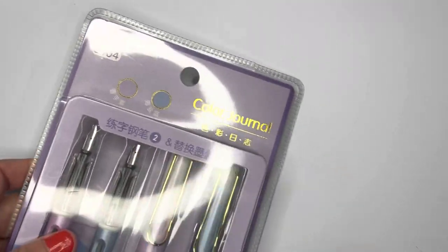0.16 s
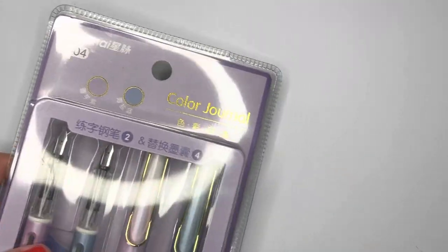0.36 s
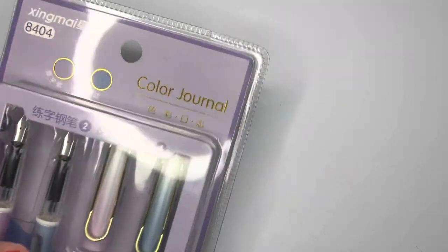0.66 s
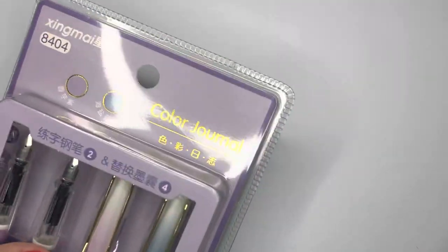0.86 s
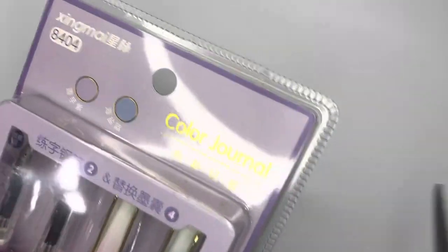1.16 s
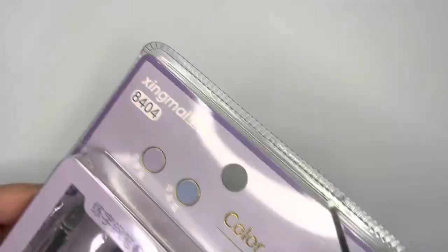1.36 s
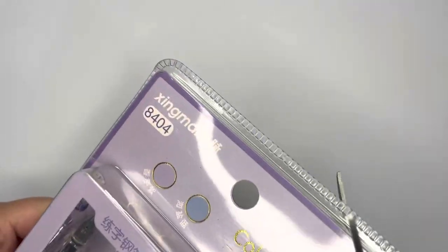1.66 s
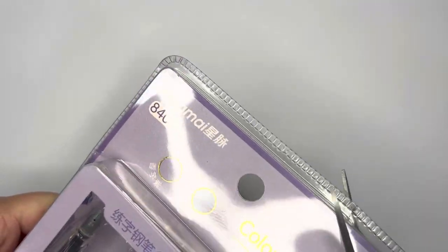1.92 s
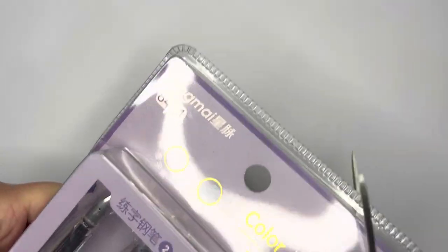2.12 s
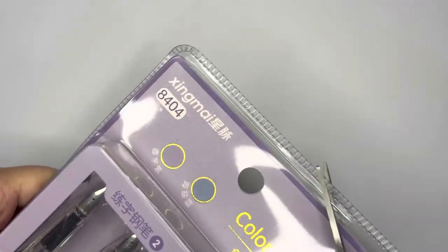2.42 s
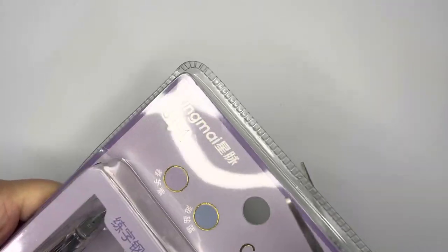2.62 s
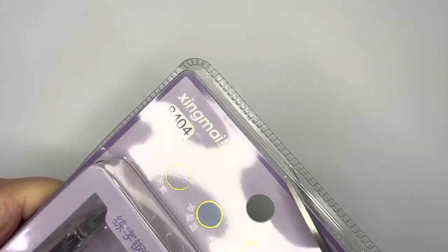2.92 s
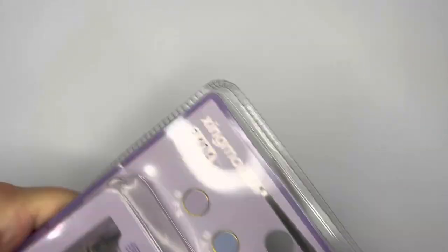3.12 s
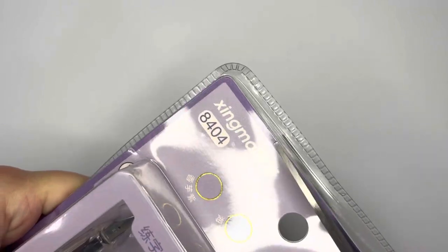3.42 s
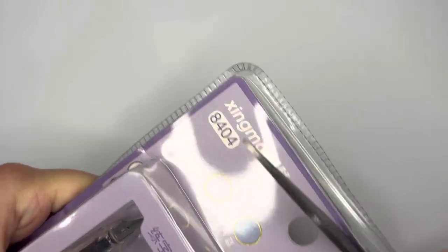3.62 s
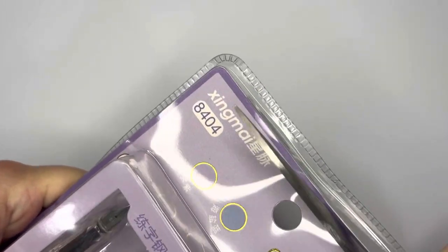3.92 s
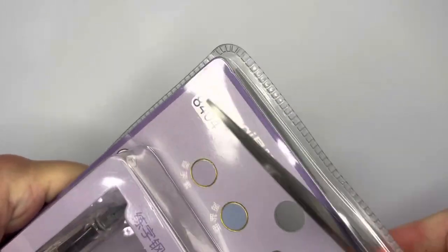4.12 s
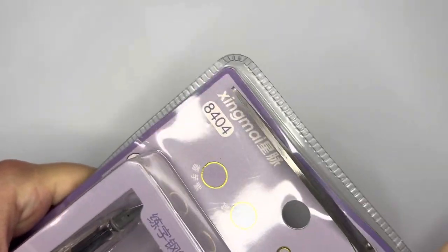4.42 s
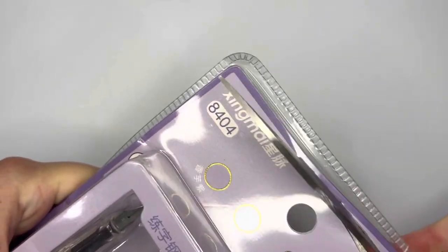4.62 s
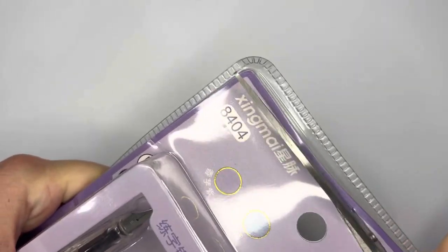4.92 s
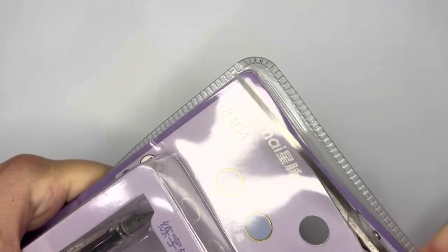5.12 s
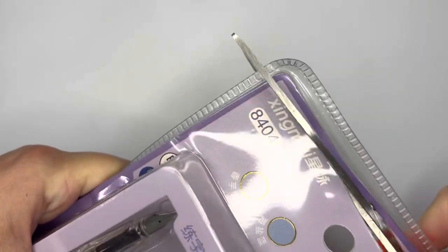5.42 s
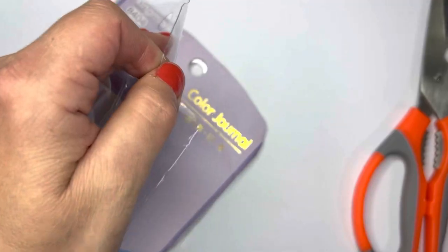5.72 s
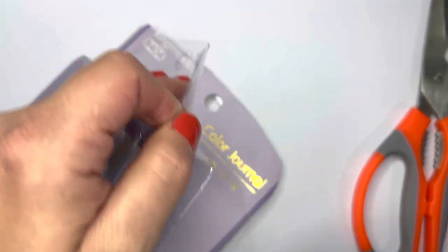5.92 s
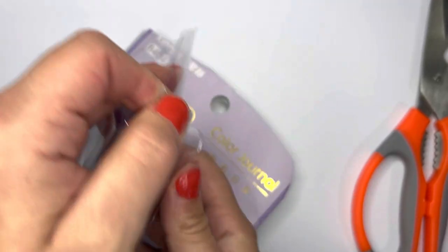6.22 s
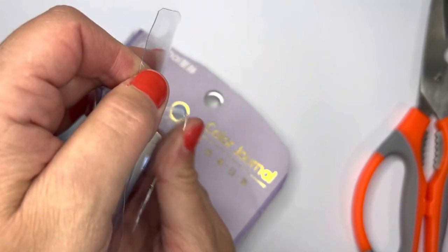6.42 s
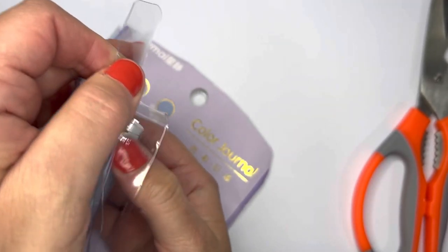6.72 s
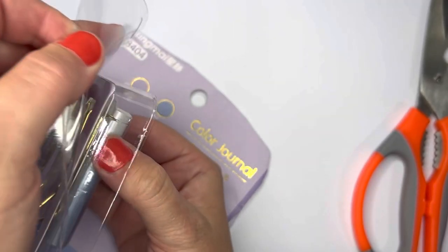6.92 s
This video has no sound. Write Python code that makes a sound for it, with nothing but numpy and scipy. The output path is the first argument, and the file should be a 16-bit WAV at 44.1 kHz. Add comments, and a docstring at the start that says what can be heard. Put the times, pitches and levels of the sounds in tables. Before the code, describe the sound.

A small, quiet indoor space with low rumble and very faint hum, heard close in stereo with little reverberation. From 0 to 0.75 s fingers shift on a stiff plastic pack: soft rubbing, dull thuds and several hollow crackles. It is nearly still until about 1.3 s, when scissors bite with a click and short scrape. Sparse ticks follow, then from 2.0 s cutting grows busy: gritty blade strokes, boxy plastic knocks and sharp snaps, with a strong hollow pop at 2.3 s. Irregular clusters continue through 3 and 4 s, many clicks turning brighter and thinner, until about 5.47 s. The room tail breaks off at 5.5 s. Fingers then slide over the freed flap, with stronger resonant rubs near 5.7 and 6.05 s. At 6.45 s a loud crack bursts out, followed by a brief creak, light rubbing, small ticks and another faint creak at 7 s.

```python
"""Cutting open a blister pack

Fingers shift on a stiff plastic pack, scissors cut its edge, then fingers slide over the flap and prise it up.
Cracks and handling knocks: noise bursts through shell modes, treble first. Bumps: dull thuds and a slow sway.
Scrapes and creaks: stick-slip noise through plastic modes; faint rustling noise patches at random moments.
Small quiet room, low rumble and hum, two close microphone ports; reverberation breaks off at the jump from
cutting to prising."""
import sys
import numpy as np
from scipy import signal
from scipy.fft import rfft, irfft, next_fast_len
from scipy.io import wavfile
from scipy.ndimage import uniform_filter1d

SR = 44100
rng = np.random.default_rng(int(sys.argv[2]) if len(sys.argv) > 2 else 0)


def wav_out(sig):
    """Save sig, one row per channel (or a flat mono array), as 16-bit PCM at SR to the path in sys.argv[1]."""
    wavfile.write(sys.argv[1], SR, np.round(np.clip(np.atleast_2d(sig).T, -1, 1) * 32767).astype(np.int16))


N = 311346
TIME_S = np.arange(N) / SR

# room rumble spectrum: (frequency [Hz], relative density [dB])
AIR_SPECTRUM = [(15, -20.5), (30, -7), (70, 10.5), (110, 0.5), (210, -6), (350, -10.5), (750, -42.5),
                (2500, -68), (5000, -42), (15000, -51)]
# mains and fan hum: (frequency [Hz], rms before waver [dB])
HUM_TONES = [(60, -64), (119.5, -61.5), (198.5, -60)]
# fingers shift their hold, later slide over the freed flap:
# (start [s], length [s], level [dB], hiss re level [dB])
FINGER_STROKES = [(-.02, 0.045, -46, -17.5), (0.046, 0.25, -54.5, -12.5), (0.215, 0.027, -44.5, -14.5),
                  (0.362, 0.068, -47, -18.5), (0.467, 0.16, -55.5, -8.5), (0.625, 0.09, -48.5, -9.5),
                  (0.754, 0.18, -74, 7.5), (0.976, .04, -69.5, 16.5), (1.08, 0.17, -76, 15),
                  (5.5, 0.023, -73, -18), (5.617, 0.037, -51, -11), (5.706, 0.2, -42, -16),
                  (5.97, .1, -57, -5), (6.045, .085, -35, -13.5), (6.181, 0.24, -47.5, -4),
                  (6.344, 0.058, -38, -6.5), (6.45, 0.13, -36.5, -12), (6.597, 0.1, -51.5, -6.5),
                  (6.728, 0.057, -49.5, -5.5), (6.829, 0.063, -51, -5), (6.939, 0.066, -52, -3.5)]
# sliding finger spectrum: (frequency [Hz], relative density [dB])
FINGER_SPECTRUM = [(120, 5.5), (300, -4), (450, 2), (750, 0.5), (1100, -3), (1700, 0.5), (2400, -10),
                   (3200, -5), (4500, -9.5), (6000, -15), (8000, -14.5), (12000, -12), (15000, -18.5)]
# pack bumps and flexes in the hand: (time [s], sway [dB], dull thud [dB], nominal thud duration [s])
HAND_THUMPS = [(0.22, -31, -29.5, 0.0098), (0.236, -29, -24, 0.02), (0.383, -30, -25.5, 0.02),
               (0.482, -35, -33, 0.022), (0.588, -43, -22.5, 0.085), (0.643, -23.5, -28.5, 0.02),
               (0.74, -26, -25.5, 0.012), (1.348, -28, -37.5, .004), (2.003, -46, -38.5, .006),
               (2.087, -24, -33, .019), (2.311, -22.5, -33, 0.038), (2.547, -37.5, -26.5, 0.011),
               (2.818, -31, -37, 0.0017), (2.857, -25, -45.5, .025), (3.095, -30, -26, 0.033),
               (3.269, -39.5, -30.5, 0.0076), (3.33, -29, -35, 0.005), (3.525, -40, -32.5, 0.011),
               (3.82, -40.5, -26.5, 0.008), (4.19, -42, -40, 0.013), (4.783, -34, -35, 0.014),
               (4.942, -34.5, -44, .009), (5.131, -38.5, -30.5, 0.013), (6.447, -43, -27.5, 0.012)]
# cracks of the plastic, and in the first second dull knocks of the handled pack: (time [s], shell ring [dB],
# crack [dB], top tick [dB],
PLASTIC_SNAPS = [(0.2338, -27.5, -33.5, -56.5, 0.0096, 1210), (0.3756, -29.5, -37.5, -78, 0.01, 510),
                 (.413, -51, -42.5, -77, 0.0044, 490), (0.6307, -34, -42, -49, 0.0075, 464),
                 (0.652, -29.5, -28, -55, 0.01, 490), (0.6998, -29, -32.5, -47.5, 0.00035, 1870),
                 (0.7296, -25.5, -37, -50.5, 0.013, 475), (0.849, -82, -53, -60, .003, 1730),
                 (1.293, -43.5, -60, -71.5, 0.0086, 736), (1.3287, -37, -35.5, -43, 0.021, 3860),
                 (1.3486, -24, -28, -28.5, 0.0011, 814), (1.442, -41, -40, -49.5, 0.022, 784),
                 (1.516, -47, -48, -76, 0.0012, 630), (1.593, -48, -57, -53.5, .003, 649),
                 (1.6154, -54, -67, -48, 0.00057, 590), (1.644, -61.5, -64, -49.5, .0004, 600),
                 (1.682, -38, -51.5, -58, 0.0021, 980), (1.917, -27.5, -46.5, -52.5, .0025, 564),
                 (1.9756, -57.5, -55.5, -47, 0.02, 2850), (1.9998, -25.5, -22.5, -30, .001, 2540),
                 (2.012, -35, -29.5, -34, 0.0012, 650), (2.069, -26.5, -36, -38, 0.012, 660),
                 (2.1292, -35, -27, -22, 0.00037, 4060), (2.2, -33, -42.5, -51.5, .0033, 720),
                 (2.212, -24.5, -38.5, -42, .0096, 786), (2.23, -33.5, -44.5, -47, .0015, 855),
                 (2.269, -35, -54.5, -57.5, .009, 785), (2.2965, -22.5, -28, -23, .0011, 750),
                 (2.3008, -13, -31.5, -28, .0045, 686), (2.324, -25.5, -29, -39, .0019, 656),
                 (2.3443, -20.5, -30, -29.5, 0.002, 836), (2.445, -50.5, -47.5, -41.5, .0011, 4920),
                 (2.4977, -33.5, -36, -39, .025, 704), (2.521, -32, -31.5, -31, 0.0039, 490),
                 (2.5397, -25, -36.5, -32, .006, 860), (2.5612, -25.5, -31, -38.5, .0017, 816),
                 (2.7348, -37.5, -53.5, -54, 0.011, 660), (2.773, -36, -46, -40.5, 0.0033, 450),
                 (2.8, -33.5, -31, -43, 0.0012, 510), (2.83, -26, -30.5, -33, 0.0033, 596),
                 (2.8606, -27, -33, -37.5, 0.0012, 440), (2.883, -39.5, -42.5, -51, .004, 880),
                 (2.9523, -57, -54.5, -62, .0018, 820), (3.019, -35.5, -34, -36.5, .0004, 4730),
                 (3.046, -37.5, -38.5, -47, 0.0018, 2330), (3.089, -22.5, -28, -26.5, 0.0031, 710),
                 (3.1081, -29, -21, -21, 0.0038, 4250), (3.2037, -45, -64, -66.5, 0.0043, 600),
                 (3.2641, -27, -22.5, -33.5, 0.0015, 2630), (3.3218, -30, -32.5, -30.5, 0.0057, 576),
                 (3.3662, -33.5, -34.5, -43, .0047, 2380), (3.469, -33, -35, -40, 0.0044, 555),
                 (3.4982, -35, -26.5, -26.5, 0.001, 2500), (3.517, -40.5, -37.5, -26, .0003, 6060),
                 (3.5376, -23.5, -27, -35, 0.0051, 641), (3.6013, -42, -36.5, -36, .001, 5410),
                 (3.699, -42.5, -39, -50, .0006, 435), (3.8257, -33.5, -59.5, -60, 0.0022, 383),
                 (3.9543, -32, -54.5, -60.5, 0.00025, 615), (4.0005, -42, -42, -53, 0.0098, 960),
                 (4.021, -45, -33, -34, 0.001, 6100), (4.055, -28.5, -41, -42, 0.012, 570),
                 (4.1007, -31, -33, -37, 0.00078, 880), (4.1848, -32, -22.5, -25.5, 0.0026, 4330),
                 (4.297, -34, -33, -29, .0034, 5720), (4.5075, -46, -33.5, -28, .001, 6030),
                 (4.62, -37, -29, -36, .0018, 5200), (4.6315, -33.5, -27, -49.5, 0.0034, 2345),
                 (4.6774, -22, -22.5, -37.5, 0.0014, 1490), (4.754, -31, -26.5, -33, 0.0022, 5190),
                 (4.7876, -37.5, -23.5, -28.5, .0003, 4900), (4.887, -37.5, -40, -40.5, 0.0049, 475),
                 (4.924, -41.5, -32.5, -27, .001, 4950), (4.9404, -38, -22, -19.5, 0.0018, 5100),
                 (5.0624, -40.5, -58, -64.5, 0.0071, 440), (5.0973, -37, -36, -31.5, .0008, 6000),
                 (5.133, -33, -25.5, -24.5, .004, 5100), (5.1408, -26.5, -42.5, -30.5, 0.0068, 700),
                 (5.184, -31, -36, -26, 0.006, 650), (5.1936, -29.5, -28.5, -47, .0014, 700),
                 (5.245, -51, -46, -39, 0.00055, 5560), (5.406, -37.5, -45.5, -38, 0.0024, 667),
                 (5.435, -39, -54, -48, 0.0033, 670), (5.4718, -34, -32, -34.5, 0.0035, 4350),
                 (5.6586, -40, -31.5, -69.5, 0.0014, 2300), (5.706, -53, -42.5, -56, 0.0034, 1160),
                 (6.081, -37.5, -44, -42.5, .0045, 1093), (6.4133, -39, -35, -43, 0.00093, 4520),
                 (6.4565, -17, -16, -23.5, .004, 1020), (6.648, -42, -48, -59, .003, 1667),
                 (6.778, -51, -50, -69, .0005, 1628), (6.851, -49.5, -45, -52, 0.00394, 418),
                 (6.874, -42.5, -39.5, -47.5, 0.0043, 1860), (7.018, -35, -47, -53, .008, 640)]
# blister shell resonances: (frequency [Hz], width [Hz], gain [dB])
SHELL_MODES = [(462, 53, 3), (635, 76, -0.5), (750, 50, -4), (902, 70, -4), (1157, 19, -4),
               (1460, 85, -0.5), (2450, 520, 4), (5080, 93, -8)]
# cutting period: (start [s], end [s])
CUTTING_SPAN = (1.3, 5.49)
# scissor pushes through the sheet: (start [s], length [s], level [dB], hiss re level [dB])
SCISSOR_STROKES = [(1.341, .025, -34, -18), (1.403, 0.2, -55.5, -22), (1.615, .14, -61, -24),
                   (2.031, 0.047, -40.5, -1), (2.188, .045, -43, -13.5), (2.291, .055, -42, 3.5),
                   (2.521, 0.052, -34, -9), (2.815, 0.048, -49, -4), (3.002, 0.092, -45, -6.5),
                   (3.093, 0.034, -30.5, -4), (3.243, 0.11, -51, -8.5), (3.491, 0.04, -39, -1.5),
                   (3.541, 0.048, -33.5, -11), (3.662, 0.089, -49, -11), (4.005, .035, -32, -3.5),
                   (4.105, 0.06, -42, -6), (4.274, 0.044, -41, -3.5), (4.425, 0.11, -49, -10.5),
                   (4.478, 0.076, -41.5, 1), (4.571, 0.088, -48, 2.5), (4.774, 0.036, -43, -1),
                   (4.843, 0.052, -47.5, -12.5), (4.935, 0.039, -40, -12), (5.08, 0.18, -44, 0.5),
                   (5.278, 0.077, -61.5, -17), (5.395, 0.019, -39.5, -6)]
# sliding blade spectrum: (frequency [Hz], relative density [dB])
BLADE_SPECTRUM = [(120, 3.5), (300, 5.5), (450, 5.5), (750, 8.5), (1100, -2.5), (1700, -1), (2400, -1),
                  (3200, -3.5), (4500, -3.5), (6000, -2), (8000, -3), (12000, -2.5), (15000, -7.5)]
# singing of the cut strip: (time [s], resonance gain [dB])
STRIP_GAIN = [(1.3, -4), (3.5, 2.5), (4.45, -6), (5.3, -23)]
# faint rustling patch: (low band [dB], middle band [dB], top band [dB],
# decay constant [s], negative keeps the noise steady, centre panel [Hz])
MEAN_RUSTLE = (-50, -62.5, -53.5, -2.2, 754)
# resonances of the flap held between fingers: (frequency [Hz], width [Hz], gain [dB])
FLAP_MODES = [(730, 18, -3.5), (1146, 22, 6), (1443, 89, 1), (2010, 37, 4), (2497, 61, 6),
              (2850, 190, -5.5), (3380, 140, -1), (4570, 300, -7)]
# flap prised up and bent back: (start [s], length [s], mean slip rate [1/s], level [dB])
FLAP_CREAKS = [(6.512, .095, 240, -42.5), (6.968, .022, 160, -41), (7.013, .05, 170, -41)]
# room decay: (frequency [Hz], t60 [s])
ROOM_DECAY = [(100, 0.62), (500, 0.087), (1500, 0.13), (5000, 0.13), (14000, 0.12)]
# port phase, positive where left leads: (frequency [Hz], phase [rad])
PHASE_LEAD = [(0, 0), (1460, -0.0), (2070, 0.6), (2760, -1.0), (4050, -0.4), (5000, -0.9), (5600, 2.1),
              (7490, 3.5), (8610, 6.1), (10200, 6.5), (12100, 9.3), (13600, 9.5), (15200, 12.5),
              (16700, 12.5)]
# port likeness: (frequency [Hz], shared amplitude [0-1])
LIKENESS = [(60, 0.98), (900, 0.83), (1750, 0.097), (2400, 1), (3400, 0.2), (4400, 1), (5400, 0.22),
            (7000, 0.87), (15000, 0.89)]
# port balance: (frequency [Hz], left minus right [dB])
BALANCE = [(60, 1), (110, -0.5), (200, 0.5), (380, -4), (700, -0.5), (1290, -1), (2380, 0.5), (4400, -5),
           (8120, 1), (15000, -1)]

# grip of a sliding stroke: (attack [s], release [s])
BLADE_GRIP, FINGER_GRIP, CREAK_GRIP = (0.0053, 0.011), (0.011, 0.032), (.012, 0.0065)
AIR_DB, REST_DB = -49.5, -69.5
SWAY_HZ, STRIP_HZ, STRIP_WIDTH_HZ = 66.7, 4800, 900
RUSTLES_PER_S, RUSTLE_SPREAD_DB = 12, 3  # rate within strokes, spread either way
EDGE_HZ = 16000


def amp(db):
    """Decibels to gain."""
    return 10 ** (np.asarray(db) / 20)


def evened(x):
    """Scales to rms 1."""
    return x / np.sqrt(np.mean(x ** 2) + 1e-20)


def read(points, hz):
    """Reads a (Hz, value) table on a log-frequency axis."""
    f, value = np.transpose(points)
    return np.interp(np.log(hz + 1), np.log(f + 1), value)


def band(x, lo_hz, hi_hz, order=3):
    """Causal band-pass."""
    edges_hz = [lo_hz, min(hi_hz, SR / 2 - 100)]
    return signal.sosfilt(signal.butter(order, edges_hz, "band", fs=SR, output="sos"), x)


def colour(x, points):
    """Filters x by a (Hz, dB) table."""
    size = next_fast_len(N)
    gain = amp(read(points, np.fft.rfftfreq(size, 1 / SR)))
    return irfft(rfft(x, size) * gain, size)[:, :N]


def resonate(x, hz, width_hz):
    """One resonance of peak gain 1."""
    return signal.lfilter(*signal.iirpeak(hz, hz / width_hz, fs=SR), x)


def ring(x, modes):
    """A piece of plastic passes a force on and rings with its own modes."""
    return x + sum(amp(db) * resonate(x, hz, width_hz) for hz, width_hz, db in modes)


def burst(x):
    """Scales a short stereo sound to the energy of 10 ms at rms 1."""
    return x / np.sqrt(np.sum(x ** 2) / (2 * .01 * SR) + 1e-20)


def add(mix, start_s, sound):
    """Adds a stereo sound at start_s."""
    part = mix[:, max(round(start_s * SR), 0):][:, :sound.shape[1]]
    part += sound[:, :part.shape[1]]


def background(waver=0.43, drift_rad=.5):
    """Low room rumble as coloured noise, plus hum tones of slowly wavering level and phase."""
    knots_s = np.linspace(0, TIME_S[-1], 40)
    hum = 0
    for hz, db in HUM_TONES:
        size, drift = (np.interp(TIME_S, knots_s, v) for v in rng.standard_normal((2, len(knots_s))))
        tone = np.sin(2 * np.pi * hz * TIME_S + drift_rad * drift)
        hum = hum + np.sqrt(2) * amp(db) * (1 + waver * size) * tone
    rumble = evened(colour(rng.standard_normal((2, N)), AIR_SPECTRUM))
    return amp(AIR_DB) * rumble + hum


def slips(per_s, spread_db, smooth_db, catch_s):
    """Stick-slip: a shower of tiny catches of uneven size over a smooth hiss."""
    size = amp(spread_db * np.minimum(rng.exponential(1, N), 3))
    hits = size * (rng.random(N) < per_s / SR)
    catches = signal.lfilter([1], [1, -np.exp(-1 / (catch_s * SR))], hits)
    return evened(rng.standard_normal((2, N)) * (evened(catches) + amp(smooth_db)))


def wander(x, patchy_db=2.3):
    """As the contact point moves, different bands of the sheet answer from moment to moment."""
    z = signal.stft(x, SR, nperseg=512, noverlap=384)[2]
    patches = uniform_filter1d(rng.standard_normal(z.shape[1:]), size=7, axis=0)  # over frequency
    patches = evened(uniform_filter1d(patches, size=10, axis=1))  # over time
    return signal.istft(z * amp(patchy_db * patches), SR, nperseg=512, noverlap=384)[1][:, :N]


def stroke(start_s, length_s, attack_s, release_s):
    """Pressure of one sliding stroke: takes hold, keeps its pressure, lets go."""
    attack = np.clip((TIME_S - start_s) / attack_s, 0, 1)
    return attack * np.exp(-np.clip((TIME_S - start_s - length_s) / release_s, 0, 20))


def sliding(force, strokes, grip):
    """Plays a friction sound in strokes, each with its own pressure and share of hiss."""
    body, hiss = evened(band(force, 150, 2500)), evened(band(force, 3600, 17500))
    pressure, sharpness = np.zeros((2, N))
    for start_s, length_s, level_db, hiss_db in strokes:
        push = amp(level_db) * stroke(start_s, length_s, *grip)
        pressure = np.maximum(pressure, push)
        sharpness = np.maximum(sharpness, push * amp(hiss_db))
    return pressure * body + sharpness * hiss


def fingers():
    """Fingertips stick and slip on the sheet; once cut free, the flap rings under them."""
    grip = slips(per_s=700, spread_db=2.8, smooth_db=-1, catch_s=.0014)
    skin = colour(wander(grip), FINGER_SPECTRUM)
    flap = ring(skin, FLAP_MODES)
    holding = [row for row in FINGER_STROKES if row[0] < CUTTING_SPAN[1]]
    prising = [row for row in FINGER_STROKES if row[0] >= CUTTING_SPAN[1]]
    resting = amp(REST_DB) * evened(band(skin, 150, 4000))  # a hand never holds quite still
    return resting + sliding(skin, holding, FINGER_GRIP) + sliding(flap, prising, FINGER_GRIP)


def thumps(rise_s=0.0033, sway_s=0.026):
    """A soft push makes a dull thud and sets the pack swaying for a few slow cycles."""
    out, t = np.zeros((2, N)), np.arange(12000) / SR
    for start_s, sway_db, thud_db, duration_s in HAND_THUMPS:
        push = rng.standard_normal((2, len(t))) * t * np.exp(-t / (.7 * duration_s))
        sway = np.sin(2 * np.pi * SWAY_HZ * t) * (1 - np.exp(-t / rise_s)) ** 2 * np.exp(-t / sway_s)
        add(out, start_s, amp(thud_db) * burst(band(push, 105, 258, order=2)))
        add(out, start_s, amp(sway_db) * burst(np.array([sway, sway])))
    return out


def fracture(t, decay_s, tail_s, tail_db, first_db, grain_db=3.5, first_s=0.00013):
    """A sharp first break, a run of uneven smaller ones (steady if decay_s < 0), a weak flutter."""
    sizes = amp(grain_db * np.repeat(rng.standard_normal(len(t)), 24)[:len(t)])
    first = amp(first_db) * np.exp(-t / first_s)
    run = sizes * np.exp(-t / decay_s)
    flutter = amp(tail_db) * np.exp(-t / tail_s)
    return rng.standard_normal((2, len(t))) * (first + run + flutter)


def travel(x, tilt_db_per_oct, lag_s=0.001622):
    """Bending waves slow with falling pitch: delay = lag_s * (1/sqrt(kHz) - 1/sqrt(12))."""
    khz = np.fft.rfftfreq(x.shape[1], 1 / SR) / 1000 + .02  # offset keeps the log finite
    delay_turns = 1000 * lag_s * (2 * np.sqrt(khz) - khz / np.sqrt(12))
    tilt = amp(tilt_db_per_oct * np.log2(khz))
    return irfft(rfft(x) * tilt * np.exp(-2j * np.pi * delay_turns), x.shape[1])


def rustles():
    """Rows for faint noise patches of about 90 ms, at random moments in strokes after cutting begins."""
    low_db, middle_db, top_db, decay_s, hz = MEAN_RUSTLE
    chances = rng.random((300, 4))
    rows = []
    for when, luck, size, spot in chances:
        s, db = when * TIME_S[-1], RUSTLE_SPREAD_DB * (2 * size - 1)
        in_stroke = any(0 < s - start_s < length_s
                        for start_s, length_s, *_ in SCISSOR_STROKES + FINGER_STROKES)
        chosen = luck < RUSTLES_PER_S * TIME_S[-1] / len(chances)
        if s > CUTTING_SPAN[0] and in_stroke and chosen:
            panel_hz = hz * 2 ** (spot - .5)
            rows.append((s, low_db + db, middle_db + db, top_db + db, decay_s, panel_hz))
    return rows


def snaps_and_rustles(panel_db=9, panel_width=0.28, ring_s=0.0031,
                      patch_db=6, patch_width_hz=130, softening=0.37):
    """Breaks and rustles send bending waves through the sheet: treble arrives first, shell ring later."""
    out, t = np.zeros((2, N)), np.arange(4096) / SR
    for start_s, ring_db, crack_db, tick_db, duration_s, hz in PLASTIC_SNAPS + rustles():
        panel = [(hz, panel_width * hz, panel_db)]
        # every spot has its own high modes
        patch = [(f, patch_width_hz, patch_db) for f in rng.uniform(1615, 13920, size=9)]
        low = ring(fracture(t, ring_s + duration_s, 0.016, -24, -16.0), SHELL_MODES + panel)
        middle = ring(fracture(t, 1.3 * duration_s, .006, -8, 7), SHELL_MODES + panel + patch)
        top = ring(fracture(t, 1.3 * duration_s, .005, -9, 7), patch)
        tilt = softening * (tick_db - crack_db + 6)  # soft contacts lose treble, hard breaks are bright
        add(out, start_s, amp(ring_db) * burst(travel(band(low, 260, 1343), 0)))
        add(out, start_s, amp(crack_db) * burst(travel(band(middle, 1246, 5290), tilt)))
        add(out, start_s, amp(tick_db) * burst(band(top, 5800, 14060, order=2)))
    return out


def blades(shell_share=0.19):
    """Blades shear the sheet by stick-slip; the shell rings and the cut strip sings."""
    shear = slips(per_s=1000, spread_db=4, smooth_db=-4, catch_s=.0009)
    blade = colour(wander(shear), BLADE_SPECTRUM)
    blade = blade + shell_share * ring(blade, SHELL_MODES)
    strip_gain = amp(np.interp(TIME_S, *np.transpose(STRIP_GAIN)))
    blade = blade + strip_gain * resonate(blade, STRIP_HZ, STRIP_WIDTH_HZ)
    return sliding(blade, SCISSOR_STROKES, BLADE_GRIP)


def creak(jitter=.15):
    """Nearly regular slips at the fold ring the flap."""
    unsteady = evened(uniform_filter1d(rng.standard_normal(N), 300))
    warped_s, force = np.cumsum(1 + jitter * unsteady) / SR, 0
    for start_s, length_s, per_s, db in FLAP_CREAKS:
        pulses = evened(np.exp(-(per_s * warped_s % 1) / 0.01))  # decay constant 1/100 of a cycle
        force = force + amp(db) * stroke(start_s, length_s, *CREAK_GRIP) * pulses
    catches = force * rng.standard_normal((2, N))
    return np.std(catches) * evened(ring(band(catches, 620, 2100, order=2), FLAP_MODES))


def room(x, first_s=0.0037, per_s=2500):
    """Sparse reflections from the table and walls, each band dying at its own speed."""
    size = SR // 2
    hits = rng.random((2, size)) < per_s / SR
    taps = rng.standard_normal((2, size)) * hits * (np.arange(size) > first_s * SR)
    hz, t, z = signal.stft(taps, SR, nperseg=256)
    decay = amp(-60 * t / read(ROOM_DECAY, hz)[:, None])
    tail = signal.istft(z * decay, SR, nperseg=256)[1]
    return signal.fftconvolve(x, tail / np.linalg.norm(tail[0]), axes=1)[:, :N]


def ports(x):
    """Two close ports share most sound, with phase and level differences that depend on pitch."""
    size = next_fast_len(N + 2000)
    hz, (shared, own) = np.fft.rfftfreq(size, 1 / SR), rfft(x, size)
    same = np.clip(read(LIKENESS, hz), 0, 1)
    tilt = amp(read(BALANCE, hz) / 2)  # half the difference on each side
    turn = np.exp(-1j * np.interp(hz, *np.transpose(PHASE_LEAD)))
    right = (same * shared + np.sqrt(1 - same ** 2) * own) * turn
    return irfft(np.array([shared * tilt, right / tilt]), size)[:, :N]


def scene(room_db=-17):
    """The close pack in its room; the scene jumps from cutting to prising, so reverberation breaks off."""
    pack = fingers() + snaps_and_rustles() + blades() + creak()
    early = TIME_S < CUTTING_SPAN[1]
    reverb = room(pack * early) * early + room(pack * ~early)
    heard = pack + amp(room_db) * reverb
    return ports(heard + thumps() + background())  # thumps travel through hand and pack straight to the ports, so they stay dry


def record(dry):
    """The recorder's band limit: a linear-phase low-pass."""
    low_pass = signal.firwin(255, EDGE_HZ, window=("kaiser", 9), fs=SR)
    return signal.oaconvolve(dry, low_pass[None], "same", axes=1)


dry = scene()
out = record(dry)
wav_out(out)
```